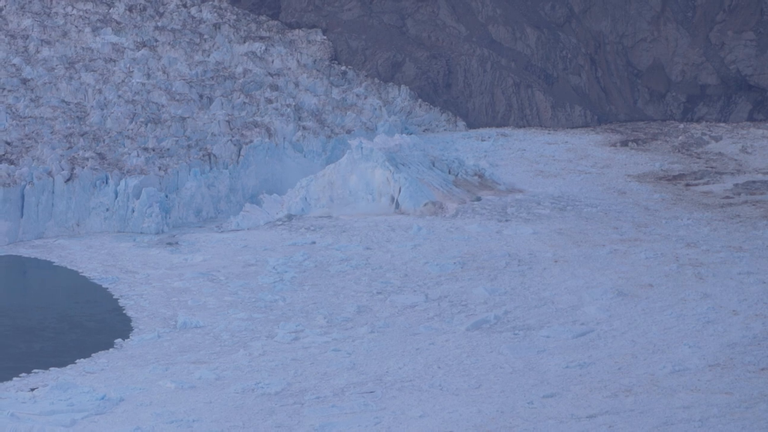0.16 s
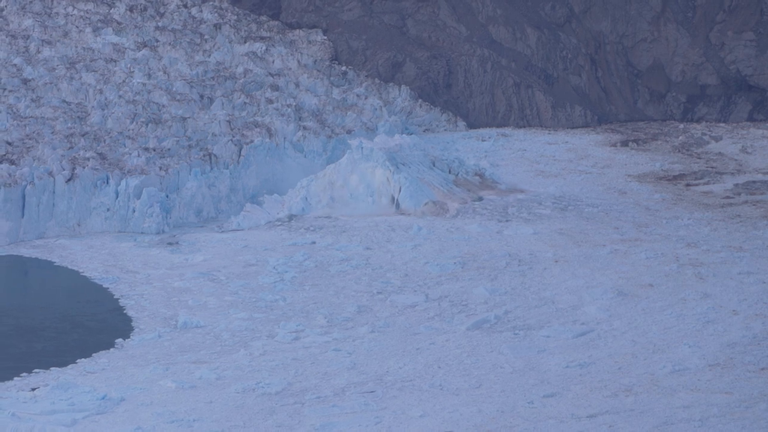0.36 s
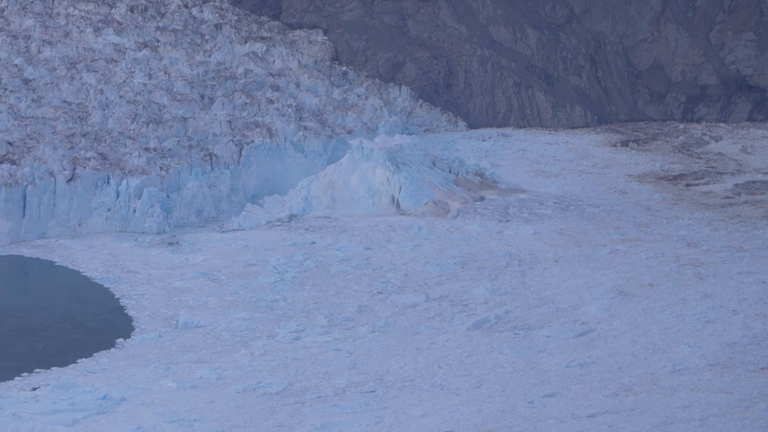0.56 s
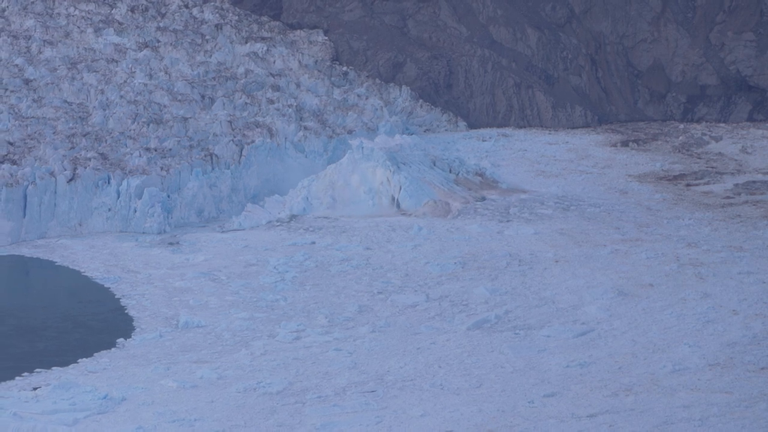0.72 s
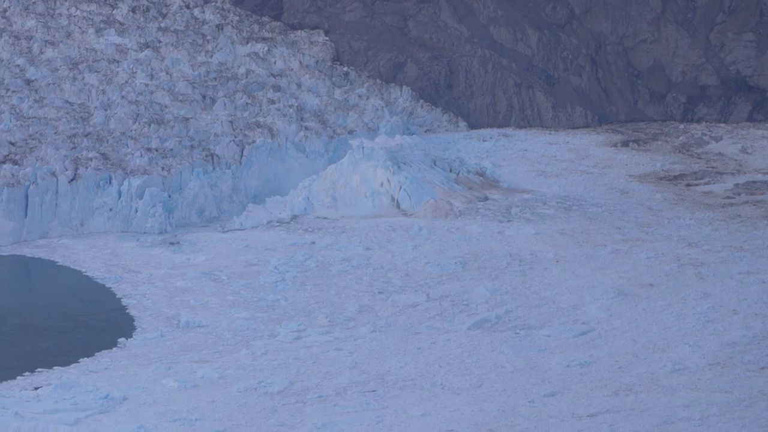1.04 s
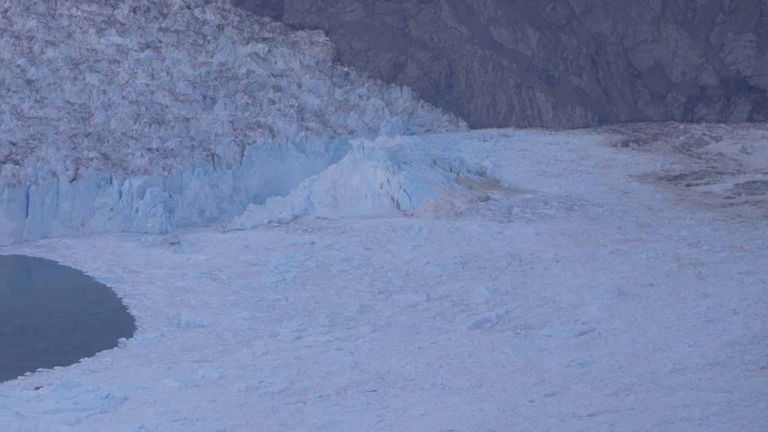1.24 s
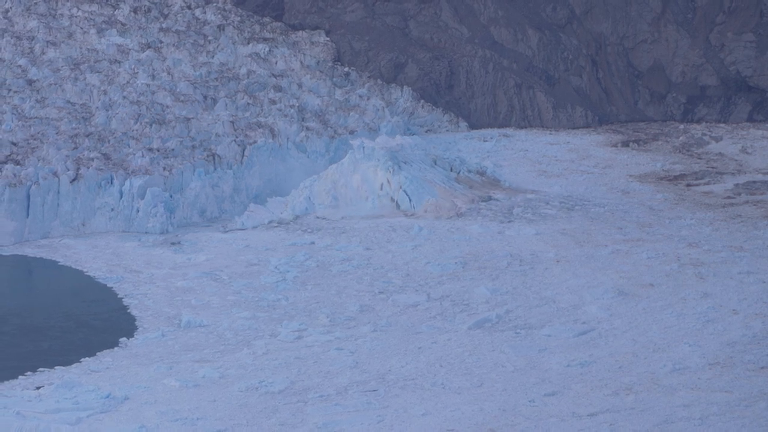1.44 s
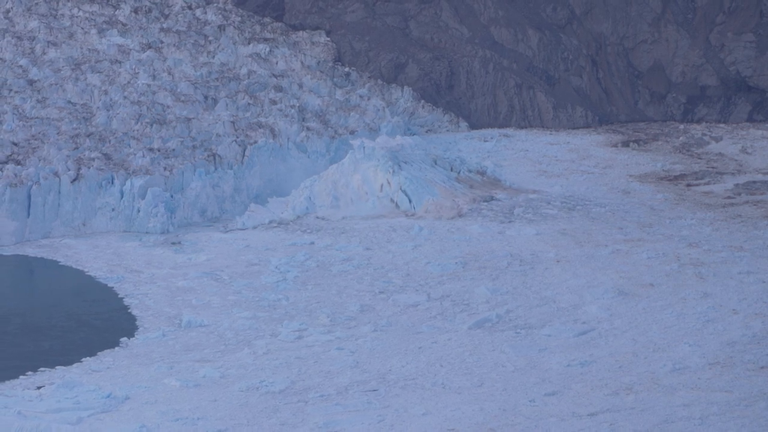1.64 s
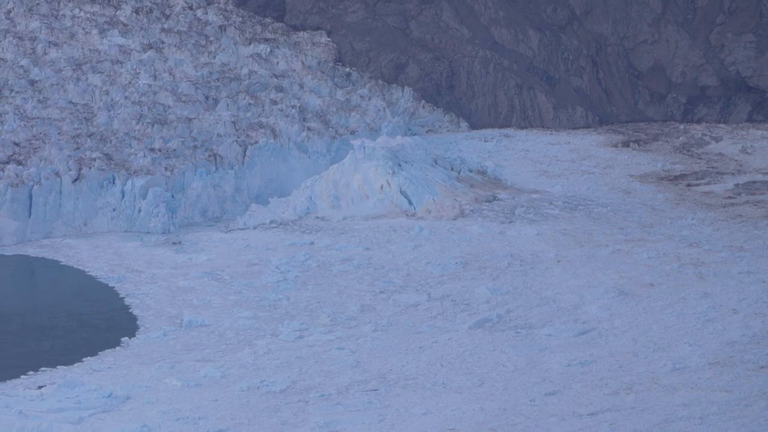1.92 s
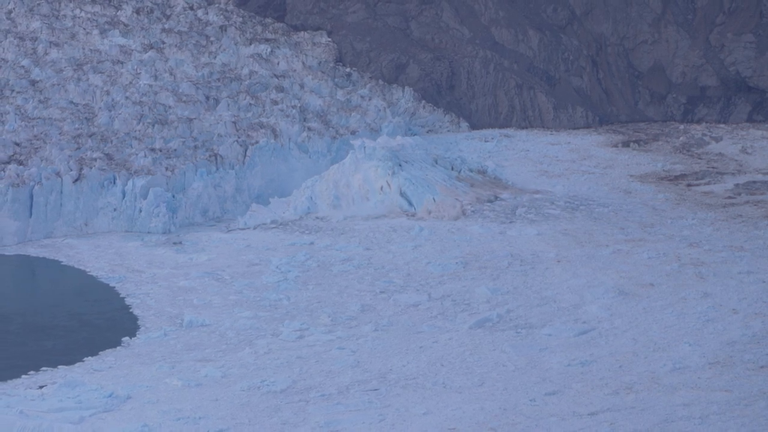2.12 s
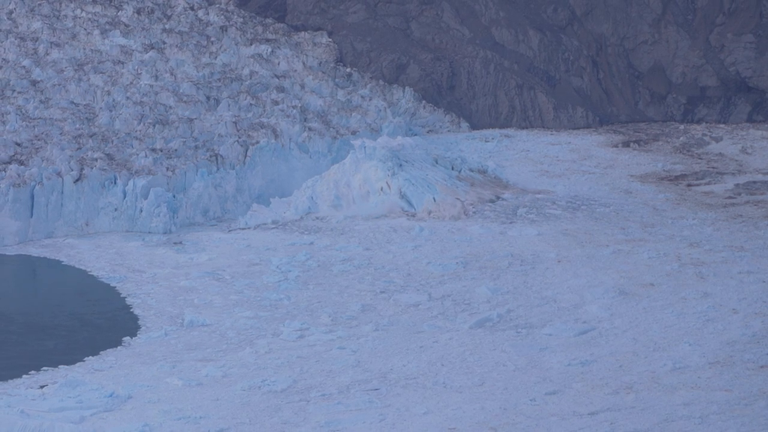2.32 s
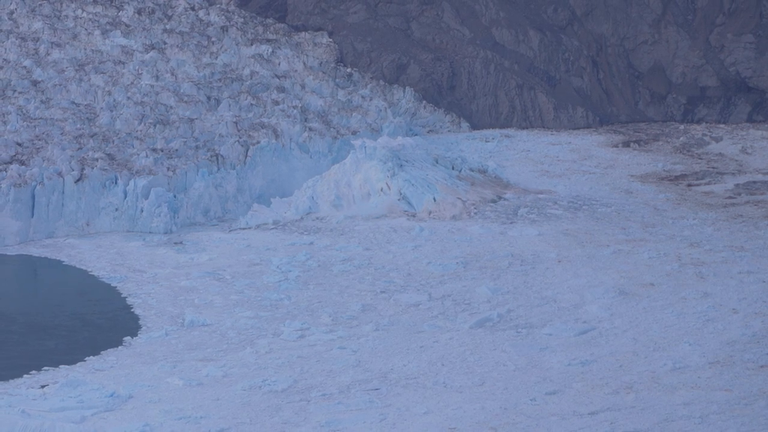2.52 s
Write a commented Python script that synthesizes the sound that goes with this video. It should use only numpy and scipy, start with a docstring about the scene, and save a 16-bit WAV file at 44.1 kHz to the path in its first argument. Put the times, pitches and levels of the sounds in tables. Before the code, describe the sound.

Deep distant rumble of ice and water rolling steadily across a wide frozen fjord, faint hiss

```python
"""A far rumble of ice and water rolls across a frozen fjord to a small stereo microphone on a rock.
Three bands of noise swell apart, almost nothing is left above 2 kHz. Chance peaks of the deep noise are set as
short low sines, with the steady deep noise lowered beneath them; two chance narrow-band peaks of the roar noise
near 500 Hz are set as faint sines. Delayed paths and scatter from the slopes spread the rumble in stereo;
preamp hiss lies on top."""
import sys
import numpy as np
from scipy import signal
from scipy.fft import rfft, irfft
from scipy.io import wavfile

SR = 44100
rng = np.random.default_rng(int(sys.argv[2]) if len(sys.argv) > 2 else 0)


def wav_record(signal):
    """Record a signal, one row per channel, as 16-bit PCM in the file named by sys.argv[1]."""
    frames = np.transpose(np.atleast_2d(signal))
    bounded = np.clip(frames, -1, 1)
    # unit amplitude maps onto the largest positive 16-bit level
    quanta = np.round(bounded * 32767).astype(np.int16)
    wavfile.write(sys.argv[1], SR, quanta)


N = 117306


def from_db(db):
    """Amplitude ratio of a level in dB."""
    return 10 ** (np.asarray(db) / 20)


def coloured_noise(spectrum):
    """Steady Gaussian noise, shaped along log frequency by a relative power density, rms 1."""
    freq_hz, density_db = np.transpose(spectrum)
    grid_hz = np.maximum(np.fft.rfftfreq(N, 1 / SR), 1)
    gain = from_db(np.interp(np.log(grid_hz), np.log(freq_hz), density_db))
    noise = irfft(rfft(rng.standard_normal(N)) * gain, N)
    return noise / noise.std()


def bell(t_s, centre_s, length_s):
    """Gaussian envelope, peak 1; length_s spans four standard deviations."""
    return np.exp(-0.5 * (4 * (t_s - centre_s) / length_s) ** 2)


# rumble band levels over time: time_s, deep_db, body_db, roar_db (rms; deep before lowering under peaks)
RUMBLE_SWELL = [(0, -38.5, -42.5, -43.5), (.4, -38, -45, -44.5), (.8, -37, -43, -43),
                (1.2, -36, -43, -42.5), (1.6, -38, -44, -42.5), (2.0, -36.5, -43, -41.5),
                (2.3, -39, -43.5, -42), (2.47, -39.5, -40, -42), (2.66, -35.5, -43.5, -41)]
# rumble colour with the dips of the ground bounce: freq_hz, density_db (per Hz, relative)
RUMBLE_SPECTRUM = [(12, -52), (20, -16), (45, -13), (70, -3), (100, 0.5), (155, -3.5), (180, -2),
                   (218, -10), (265, -5), (310, -6), (374, -15.5), (490, -9.5), (600, -12.5), (667, -17),
                   (778, -16), (870, -21), (1030, -18), (1230, -26), (1340, -24.5), (1450, -30),
                   (1680, -32.5), (1810, -40), (2200, -46), (3000, -84)]
DEEP_TOP_HZ, ROAR_BOTTOM_HZ = 215, 375
PEAK_SHARE = 0.75  # share of the steady deep amplitude removed at the centre of a noise peak


def rumble(peak_cover):
    """Distant ice and water: one noise in three bands that swell apart; deep noise is lowered under peaks."""
    time_s, *levels_db = np.transpose(RUMBLE_SWELL)
    t_s = np.arange(N) / SR
    noise = coloured_noise(RUMBLE_SPECTRUM)

    def below(cutoff_hz):
        """Zero-phase lowpass, so that the bands add back up to the noise."""
        return signal.sosfiltfilt(signal.butter(3, cutoff_hz, fs=SR, output="sos"), noise)

    deep, deep_and_body = below(DEEP_TOP_HZ), below(ROAR_BOTTOM_HZ)
    bands = (deep, deep_and_body - deep, noise - deep_and_body)
    deep, body, roar = [
        from_db(np.interp(t_s, time_s, level_db)) * band / band.std()
        for level_db, band in zip(levels_db, bands)
    ]
    return deep * (1 - PEAK_SHARE * peak_cover) + body + roar


# chance peaks of the deep noise, set as short low tones: centre_s, peak_db, pitch_hz, length_s
NOISE_PEAKS = [(0.088, -29, 94.4, 0.04), (0.269, -30, 110.9, .04), (0.318, -30, 150, 0.03),
               (0.547, -26, 95, 0.03), (0.857, -29.5, 109.9, 0.023), (0.9, -26.5, 111.2, 0.032),
               (0.977, -27.5, 150, 0.031), (1.135, -26.5, 175, 0.038), (1.139, -34, 107.4, 0.021),
               (1.382, -29, 114.4, 0.026), (1.689, -28.5, 100.6, 0.037), (1.796, -25, 129.5, 0.016),
               (1.84, -25.5, 119.5, 0.028), (1.912, -29.5, 170, 0.048), (2.097, -31.5, 182, 0.041),
               (2.475, -27.5, 115, 0.039), (2.488, -33, 275, 0.019)]


def deep_noise_peaks():
    """Chance peaks of the deep noise as short sines under bells; also returns their joint envelope, 0-1."""
    t_s, waves, cover = np.arange(N) / SR, np.zeros(N), np.zeros(N)
    phases_rad = rng.uniform(0, 2 * np.pi, len(NOISE_PEAKS))
    for (centre_s, peak_db, pitch_hz, length_s), phase_rad in zip(NOISE_PEAKS, phases_rad):
        shape = bell(t_s, centre_s, length_s)
        waves += from_db(peak_db) * shape * np.sin(2 * np.pi * pitch_hz * t_s + phase_rad)
        cover = np.maximum(cover, shape)
    return waves, cover


# chance narrow-band peaks of the roar noise, set as faint sines:
# centre_s, peak_db, start_hz, end_hz, length_s
ROAR_NOISE_PEAKS = [(1.446, -43, 440.7, 498, 0.31), (2.608, -39.5, 500, 484.3, .14)]


def roar_noise_peaks():
    """Chance narrow-band peaks of the roar noise as faint sines under bells, frequency moving linearly."""
    t_s, out = np.arange(N) / SR, np.zeros(N)
    for centre_s, peak_db, start_hz, end_hz, length_s in ROAR_NOISE_PEAKS:
        ends_s = [centre_s - length_s / 2, centre_s + length_s / 2]
        freq_hz = np.interp(t_s, ends_s, [start_hz, end_hz])
        sine = np.sin(2 * np.pi * np.cumsum(freq_hz) / SR)
        out += from_db(peak_db) * bell(t_s, centre_s, length_s) * sine
    return out


# paths to the microphone, direct first: lag_s, left_share (amplitude ratio; negative leans right)
SOUND_PATHS = [(0, -0.065), (.0016, 0.024), (.004, 0.076), (.0087, .02)]
LEFT_LAG_S = 2e-5  # left capsule behind right
WIDTH_HZ = 420  # capsules hear nearly alike below this


def path_side(mid):
    """Half the left-right difference: each lagged path leans to one side, the left lags, bass stays central."""
    hz = np.fft.rfftfreq(N, 1 / SR)
    lean = sum(left_share * np.exp(-2j * np.pi * hz * lag_s) for lag_s, left_share in SOUND_PATHS)
    lean = lean - 1j * np.pi * hz * LEFT_LAG_S  # first-order delay, half per channel
    bass_cut = hz ** 6 / (hz ** 6 + WIDTH_HZ ** 6)
    return irfft(rfft(mid) * lean * bass_cut, N)


# scatter colour: freq_hz, density_db (per Hz, relative)
SCATTER_SPECTRUM = [(88, -48), (150, -29), (172, -18), (215, -5.5), (278, -11), (390, 2), (453, 1),
                    (629, -4), (746, -6), (857, 2), (1000, -18), (1350, -9), (1900, -16), (2470, -38),
                    (4180, -120)]
SCATTER_DB = -60  # rms


def slope_scatter():
    """Rumble scattered from the slopes: independent noise, opposite in left and right."""
    return from_db(SCATTER_DB) * coloured_noise(SCATTER_SPECTRUM)


def scene():
    """Sum the rumble and its noise peaks, then spread them to left and right."""
    deep_peaks, peak_cover = deep_noise_peaks()
    mid = rumble(peak_cover) + deep_peaks + roar_noise_peaks()
    side = path_side(mid) + slope_scatter()
    return np.array([mid + side, mid - side])


# hiss colour in sum and in difference: freq_hz, density_db (per Hz, relative)
HISS_MID_SPECTRUM = [(100, -21), (1000, -5.5), (2500, 0), (5000, -3), (9000, -4.5), (16000, -7.5)]
HISS_SIDE_SPECTRUM = [(140, -30), (200, 4.5), (2500, -2), (5000, -6), (9000, -8.5), (16000, -11.5)]
HISS_MID_DB, HISS_SIDE_DB = -63, -60.5  # rms before the top is cut


def preamp_hiss():
    """Steady preamp noise, independent in sum and difference."""
    mid = from_db(HISS_MID_DB) * coloured_noise(HISS_MID_SPECTRUM)
    side = from_db(HISS_SIDE_DB) * coloured_noise(HISS_SIDE_SPECTRUM)
    return np.array([mid + side, mid - side])


CUTOFF_HZ, FADE_S = 15730, 0.002


def record(dry):
    """Add preamp hiss, fade both ends, cut the top with a steep elliptic lowpass."""
    from_start = np.arange(N)
    to_nearest_end = np.minimum(from_start, from_start[::-1])
    fade = np.minimum(1, to_nearest_end / (FADE_S * SR))
    lowpass = signal.ellip(14, 0.3, 60, CUTOFF_HZ, fs=SR, output="sos")  # ripple_db, stop_db
    return signal.sosfilt(lowpass, fade * (dry + preamp_hiss()))


dry = scene()
out = record(dry)
wav_record(out)
```